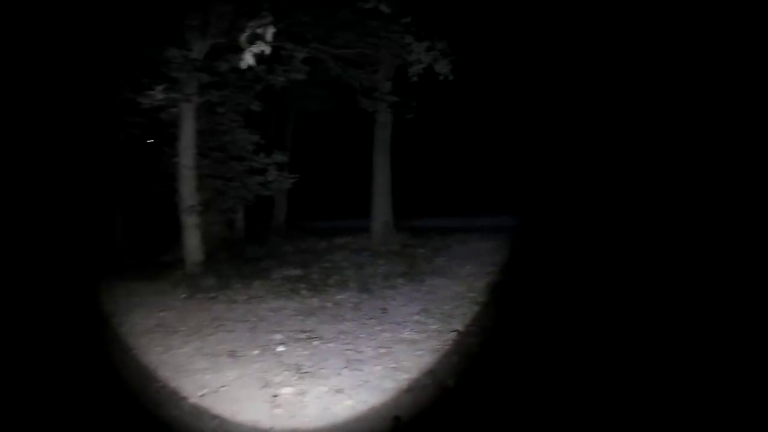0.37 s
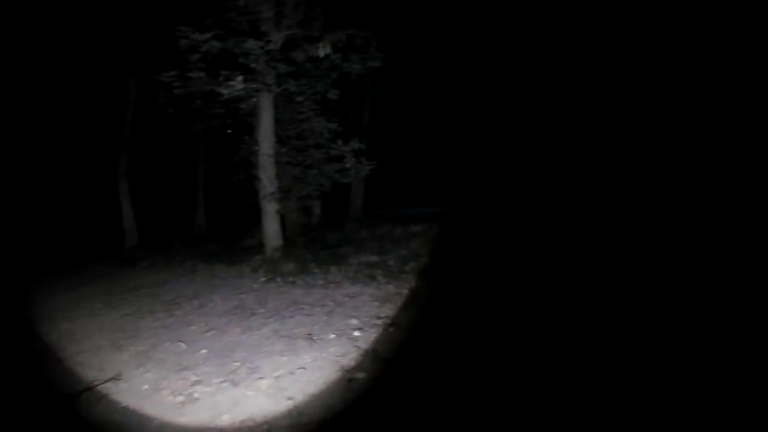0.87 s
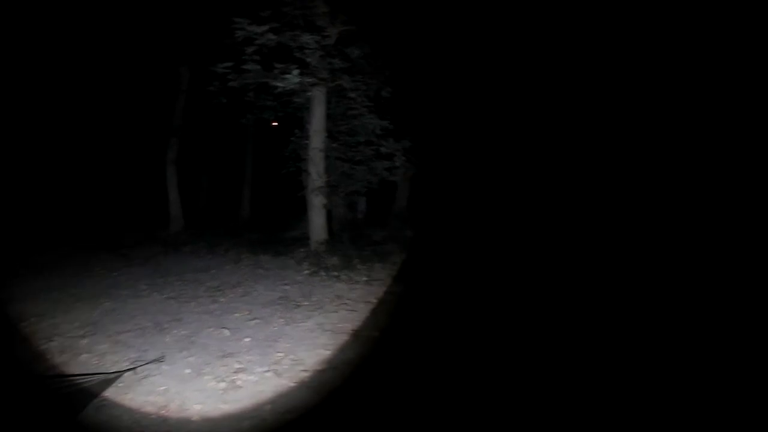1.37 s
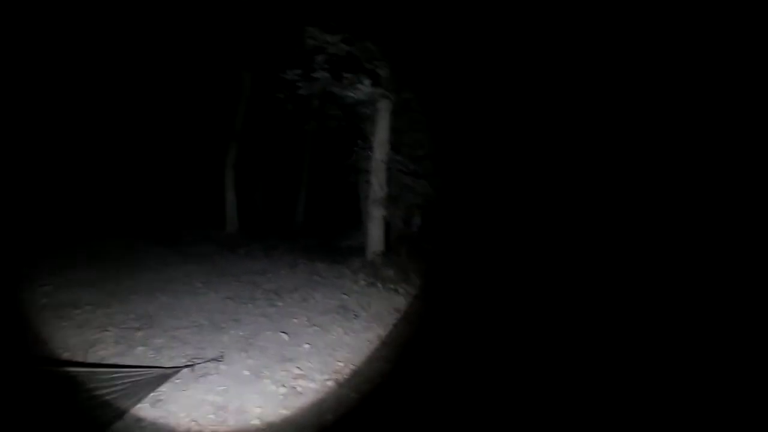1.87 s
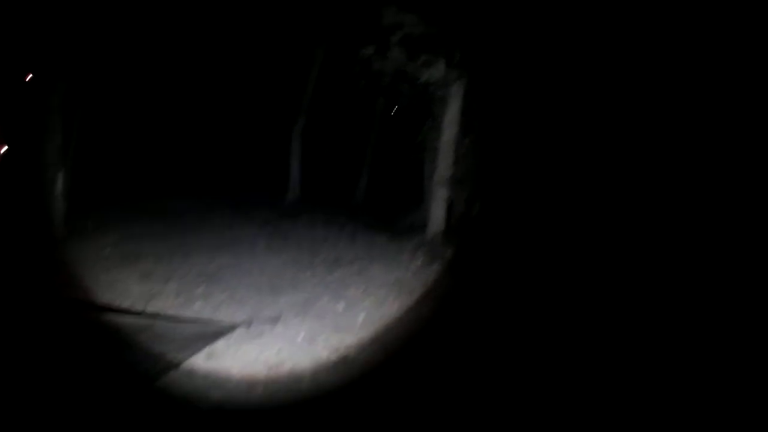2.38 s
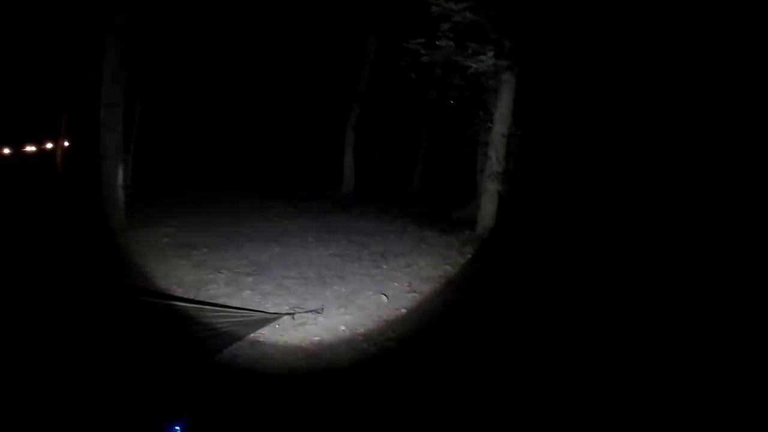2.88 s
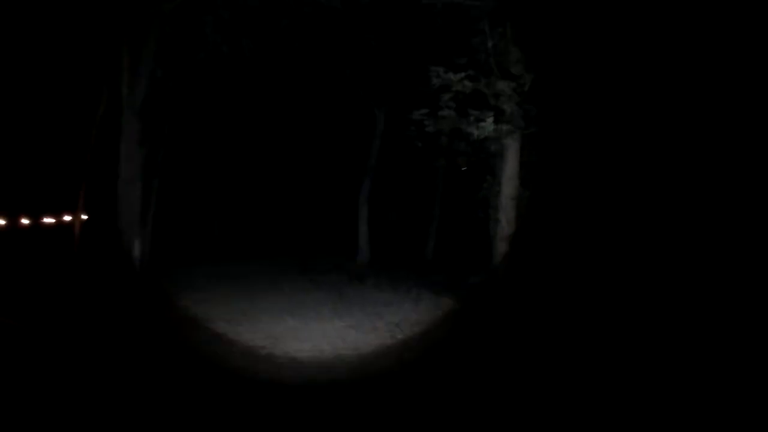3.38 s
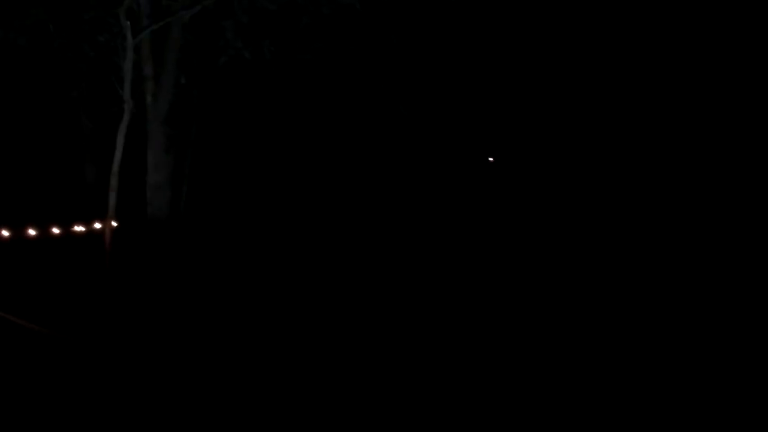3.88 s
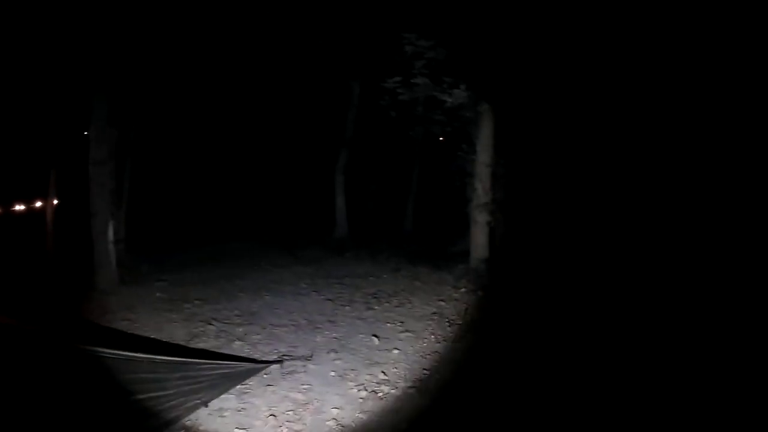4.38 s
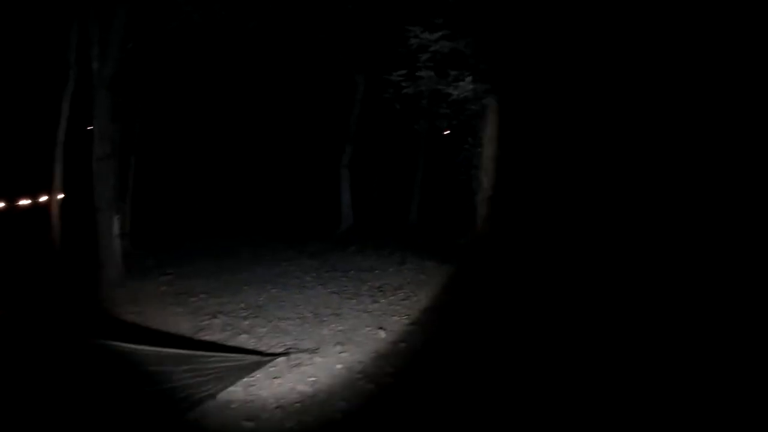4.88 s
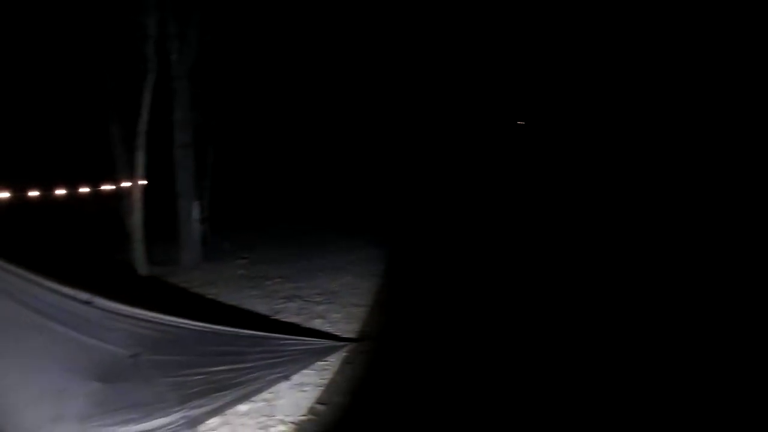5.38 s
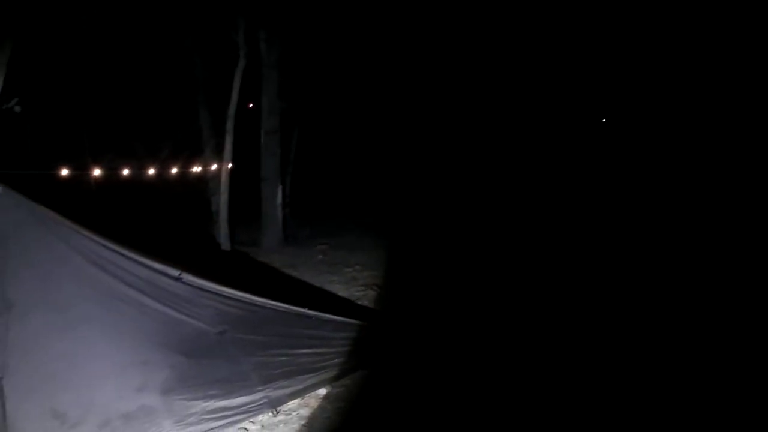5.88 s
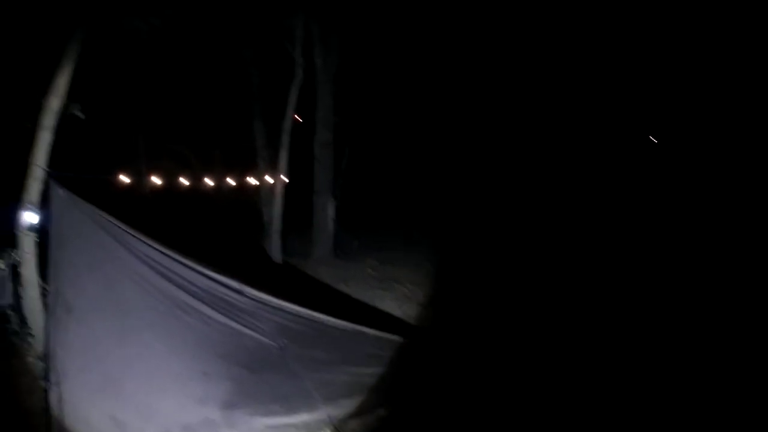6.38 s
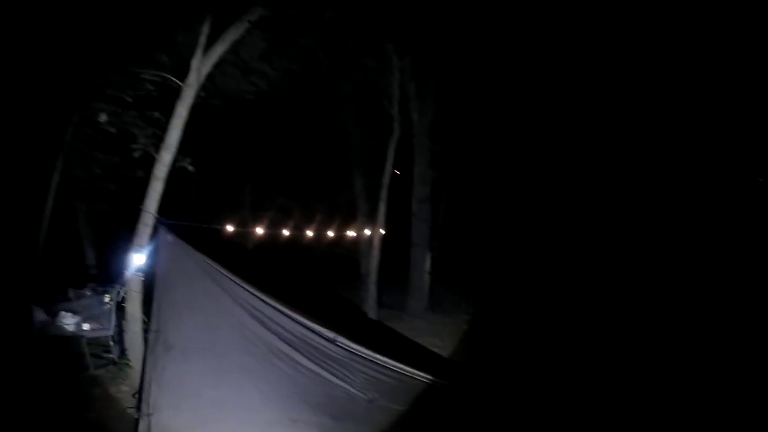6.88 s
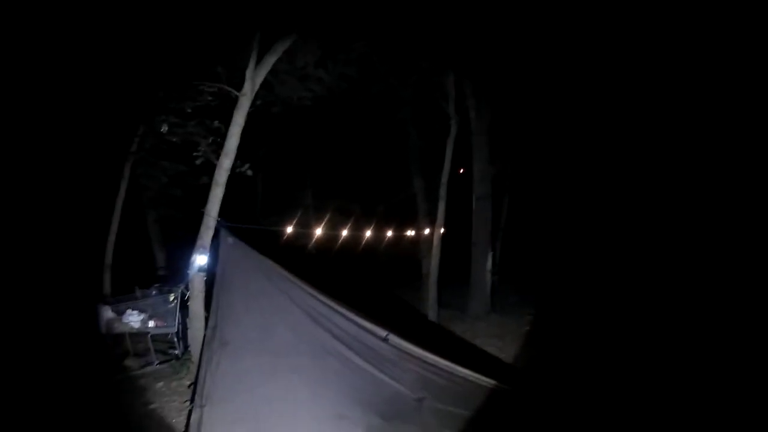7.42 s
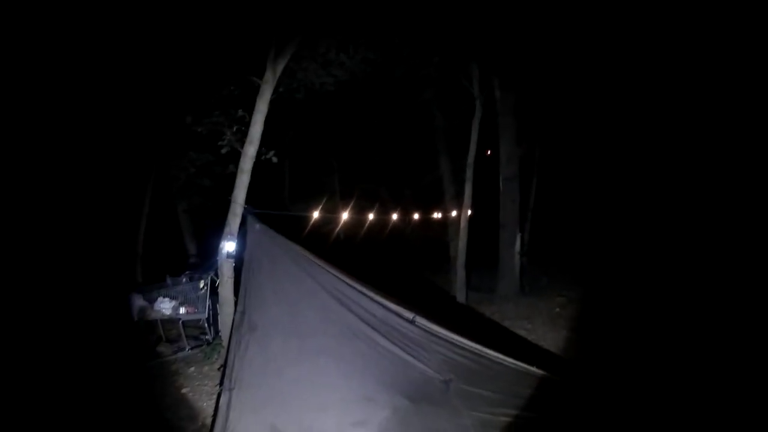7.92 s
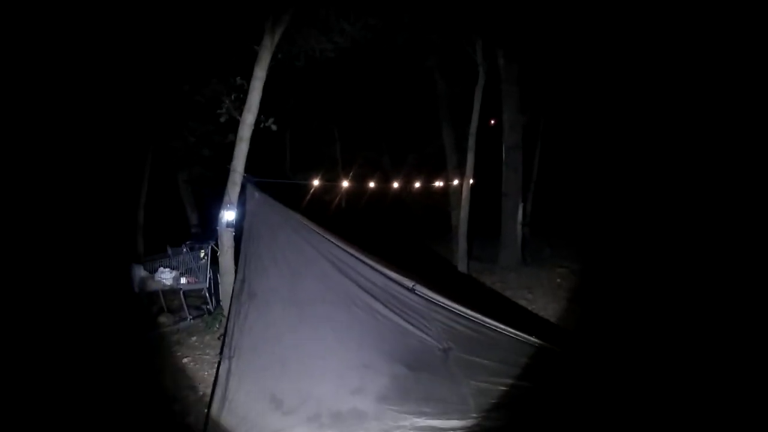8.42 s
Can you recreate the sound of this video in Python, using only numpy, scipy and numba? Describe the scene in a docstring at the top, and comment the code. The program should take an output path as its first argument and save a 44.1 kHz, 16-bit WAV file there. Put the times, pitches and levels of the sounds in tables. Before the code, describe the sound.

Night woods, heard from a handheld camera. A continuous bright bed of crickets at several pitches, faint far-insect wash and a fast, very high katydid buzz fills the air; a nearer cricket repeats short trills of roughly a third of a second or longer, with fainter chirps early and late. Light body taps fall around 0.7, 1.2, 1.5 and 1.8 s, then a heavier jolt at 2.0. The buzz fades from about 2.4 and returns near 4.6, while the chorus thins. Dull thuds land at 3.3, 3.9, 4.5 and 4.8, with a sharp snap at 3.5. Brief dry rasps come at 1.4, 5.2 and 6.8. After a quieter gap, knocks resume at 5.9 and 6.2, clustering with rustle and gritty snaps at 6.5-6.9. Insects dominate until a final rumbling bunch of thumps at 8.3-8.5.

```python
"""Footsteps and a shifting grip knock through the body of a small camera, carried slowly over dirt in a night wood:
struck modes with thuds, over band-filtered noise and grains for rumble, shuffle and scrape.
Rustles and snaps are filtered clicks and noise bursts; a wash of far insects is coloured noise.
Cricket choruses at several pitches, trills and chirps are tones gated into pulses.
One katydid buzzes high up as strokes ringing four resonances; another rasps as rippled noise."""
import sys
import numpy as np
from scipy import signal
from scipy.fft import rfft, irfft, next_fast_len
from scipy.io import wavfile
from scipy.ndimage import uniform_filter1d
from numba import njit

SR = 44100
rng = np.random.default_rng(int(sys.argv[2]) if len(sys.argv) > 2 else 0)


def makeup_ratio(level_db):
    """Linear amplitude ratio for a level in decibels (20 dB per factor of ten)."""
    decades = np.asarray(level_db, float) / 20
    return 10 ** decades


def transcribe(signal):
    """Save signal, clipped to [-1, 1], as a 16-bit WAV file at the path in sys.argv[1]."""
    frames = np.atleast_2d(signal).T
    limited = np.clip(frames, -1, 1)
    pcm = np.round(limited * 32767).astype(np.int16)
    wavfile.write(sys.argv[1], SR, pcm)


N = 376173
T = np.arange(N) / SR

# bands of the shaken casing, as rumble, low bumps, high bumps, scrape: (low edge [Hz], high edge [Hz])
SHAKE_BANDS = [(32, 91), (70, 201), (170, 299), (400, 696)]
# steady shuffle: (time [s], low bumps [dB], high bumps [dB], scrape [dB], rumble [dB])
SHUFFLE = [(0.0, -51, -62.5, -56, -49), (0.8, -53.5, -58.5, -54, -52.5), (0.94, -50, -62, -53.5, -55),
           (1.86, -53, -61.5, -50.5, -55), (2.0, -53, -57, -46.5, -44), (2.53, -47, -48.5, -47.5, -63),
           (3.08, -41, -52, -54, -50), (3.28, -41, -47.5, -52.5, -46), (3.65, -47.5, -39.5, -50, -55),
           (4.07, -43, -45.5, -53, -51), (4.37, -56.5, -43.5, -57, -47), (4.78, -41.5, -38, -63, -55),
           (5.21, -39.5, -46, -65, -54), (5.68, -43.5, -50.5, -59.5, -50), (6.85, -46, -45, -43, -57.5),
           (7.08, -49, -46.5, -49.5, -51), (7.97, -49.5, -50, -53, -55), (8.25, -51, -58, -46, -56)]
# jolts of the hand that shake the whole casing: (start [s], end [s], rumble [dB], scrape [dB])
JOLTS = [(1.983, 2.038, -28.5, -46), (6.638, 6.765, -43, -41), (7.635, 7.942, -50.5, -65),
         (8.298, 8.339, -24.5, -47), (8.363, 8.466, -25, -38)]
# bumps in a jolt, against its rumble: (low bumps [dB], high bumps [dB])
JOLT_BUMP_DB = [-7.5, -20]
# stir after a knock, against the knock: (rumble [dB], low bumps [dB], high bumps [dB], scrape [dB])
WAKE_DB = [-39, -34.5, -38, -57]
# knocks through the camera body: (time [s], swing level [dB], pitch [Hz], width at half height [ms])
KNOCKS = [(0.652, -17, 400, 0.99), (1.168, -17.5, 484, 1.16), (1.2059, -25, 386, 0.75),
          (1.4972, -17.5, 442, 0.92), (1.7971, -17.5, 463.0, 1.33), (1.8343, -28, 290, 0.54),
          (1.9923, -12, 166, 1.6), (2.0084, -11, 235, 3.9), (2.023, -17.5, 111, 11),
          (2.1124, -18.5, 493, 1.3), (2.3742, -17, 445.0, 1.36), (3.3428, -10.5, 206, 4.5),
          (3.3707, -26, 210, 7.8), (3.4359, -19, 209, 9.1), (3.5027, -24, 180, 6.3),
          (3.8894, -10.5, 249, 4.2), (3.9172, -26, 242, 14), (3.9762, -21.5, 206.0, 7.6),
          (4.0495, -18.5, 260, 3.6), (4.4996, -13, 243, 2.5), (4.6336, -25.5, 163, 2.9),
          (4.79, -11, 218, 3), (4.8226, -29.5, 228, 12), (4.927, -25.5, 174.0, 3.6),
          (4.9914, -29, 210, 6.4), (5.922, -13.5, 240, 3.3), (6.0596, -26, 217, 3.8),
          (6.1558, -14, 195, 2.2), (6.2837, -27.5, 253, 11), (6.5123, -17, 385, 1.55),
          (6.64, -14, 378, 1.4), (6.6896, -13.5, 462.0, 1.5), (6.726, -20.5, 280, 2.6),
          (6.756, -15, 233, 3.9), (6.7807, -32, 382, 1.3), (6.8932, -15.5, 386, 1.7),
          (6.9118, -40, 395.0, 2.7), (8.2858, -26, 192.4, 4.9), (8.3495, -15, 151, 8.4),
          (8.372, -12, 179, 1.8), (8.396, -13, 168.5, 13), (8.451, -17.5, 126.6, 5.3)]

# bands of the rustle: (low edge [Hz], high edge [Hz])
RUSTLE_BANDS = [(950, 1240), (1400, 3380), (2400, 3940), (6400, 8000)]
# leaves and cloth rustling: (start [s], end [s], level before band colour [dB], brightness [dB per octave])
RUSTLES = [(0, 0.16, -59, 2.5), (.62, .75, -68, -14), (1.186, 1.714, -58, -8.5), (1.93, 2.325, -60.5, 2),
           (2.413, 2.643, -61.5, -7), (3.55, 3.724, -62, -6), (3.724, 4.3, -71, -1),
           (5.923, 6.55, -57.5, -0.5), (6.6, 6.935, -52.5, -5.5), (7.45, 7.81, -66.5, -9),
           (8.065, 8.478, -58.5, -0.5)]
# colour of the spells, one value a band: (level added [dB])
RUSTLE_COLOUR_DB = [-6, -3, -1.5, -8]
# steady crackle beneath the spells, one value a band: (level [dB])
STILL_DB = [-78, -66.5, -78, -109]
# snaps of twigs, leaves and grit underfoot:
# (time [s], peak level [dB], low edge [Hz], high edge [Hz], decay constant before filtering [ms])
SNAPS = [(1.8552, -41, 1510, 1960, 2.8), (2.2613, -45, 1100, 1500, 5.), (3.484, -38, 1500, 3800, 1.),
         (3.5289, -20.5, 1110, 4440, 1.8), (3.569, -37, 2300, 4200, 4.9), (3.579, -33, 2700, 3700, 3.),
         (3.9724, -49, 10500, 12000, 2.), (6.5715, -44, 1500, 2300, 2.), (6.675, -25, 300, 1070, 2.1),
         (6.7, -36, 254, 1080, 1.8), (6.892, -33, 500, 1300, 2.3), (6.9494, -40, 1310, 2230, 2.),
         (7.234, -41, 1500, 2600, 1.8), (7.7503, -37, 1200, 3160, 1.5), (8.091, -40, 850, 1400, 2.6),
         (8.334, -37, 396, 1280, 2.6), (8.359, -29, 400, 1400, 4.9), (8.432, -37, 400, 1170, 5.6),
         (8.39, -24, 496, 1400, 7.4), (8.456, -42, 700, 2170, 2.)]
# colour of the wash of far insects: (frequency [Hz], relative density [dB])
AIR = [(530, -20), (900, -7), (1440, -31.5), (2050, -25.5), (2400, -16), (2770, 1.5), (3450, -33),
       (4500, -14), (4900, -8.5), (5950, -9), (7040, -42), (9190, -33), (11000, -30.5), (13200, -30),
       (16200, -28)]

# kinds of chorus cricket, lowest first: (pitch [Hz], spread [Hz; outermost singers lie 1.7 times this away],
# mean pulse rate [per s], sounding share of a pulse [0-1])
CHORUS = [(2226, 38, 53, .7), (2762, 80, 66, .75), (4960, 80, 41, .7), (6054, 210, 58, 0.7)]
# choruses as the walker turns: (time [s], low chorus level [dB], high chorus level [dB])
TURN = [(0.05, -49, -53), (0.16, -47, -54), (1.08, -48.5, -53.5), (1.5, -49, -52.5), (1.78, -46.5, -53),
        (2.24, -56, -56.5), (2.46, -57, -59), (2.73, -51, -55), (3.6, -54, -56), (4.11, -55.5, -59),
        (4.89, -52, -57), (5.42, -51.5, -55.5), (6.08, -51, -53), (7.06, -48.5, -53.5), (7.39, -47, -52),
        (7.88, -46, -52), (8.21, -43, -51.5), (8.44, -47.5, -52)]
# long stretches of the lowest kind: (start [s], end [s], level [dB])
DRONES = [(0, 1.22, -69.5), (1.9, 2.4, -62.5), (2.62, 4.05, -65.5), (4.65, 6.1, -71), (7.45, 7.8, -64)]
# trills of a near cricket: (start [s], end [s], level before echoes [dB], settled pitch [Hz])
TRILLS = [(.13, 0.436, -51.5, 5150), (0.682, 0.936, -49, 5110), (1.28, 1.67, -56.5, 5100),
          (1.943, 2.3, -59, 5050), (2.5, 3.217, -55.5, 5090), (3.619, 4.123, -57.5, 5070),
          (4.348, 4.64, -52.5, 5070), (4.598, 4.847, -57.5, 4910), (5.017, 5.337, -52, 5130),
          (5.624, 5.953, -49.5, 5120), (6.109, 6.452, -53.5, 5070), (7.138, 7.43, -50, 5100),
          (7.594, 7.927, -49.5, 5160), (8.153, 8.495, -56, 5085)]
# chirps of a fainter cricket: (start [s], end [s], level before echoes [dB])
CHIRPS = [(.04, 0.403, -62), (0.438, .9, -69), (0.953, 1.062, -59), (1.54, 1.66, -60), (2.564, 2.68, -62),
          (7.493, 7.8, -64), (8.053, 8.2, -65)]

# buzzing katydid: (time [s], main resonance level [dB], its centre [Hz], upper level [dB], its centre [Hz])
BUZZ = [(0.05, -54.5, 9150, -62.5, 13400), (0.42, -53.5, 9360, -62, 13400), (0.75, -54, 9400, -63.5, 13100),
        (1.43, -52, 9200, -60.5, 13000), (1.97, -50, 9400, -63, 13000), (2.44, -65, 9200, -72, 13300),
        (2.51, -66, 9360, -66, 13300), (2.74, -69, 9110, -67, 12800), (3.33, -68, 9380, -63.5, 13100),
        (3.49, -69, 9760, -68, 13400), (3.84, -73, 9460, -67.5, 13300), (4.61, -54.5, 9200, -64.5, 13100),
        (5.6, -53, 9550, -63, 13300), (5.79, -56, 9750, -62, 12700), (6.49, -56, 9320, -62, 13000),
        (6.52, -56.5, 9260, -64, 13100), (7.26, -54, 9330, -68, 13100), (7.66, -52.5, 9420, -65.5, 13100),
        (8.3, -52, 9410, -64, 12900), (8.46, -56, 9450, -72, 13400)]
# its resonances, as main, middle, upper, top: (width of each of two filters in a row [Hz])
WING_WIDTH_HZ = [2000, 1400, 1920, 2600]
# rasping katydid: (time [s; the rasp starts 3 ms before], peak level [dB])
RASPS = [(1.3786, -39), (3.246, -53), (3.9724, -54), (5.1673, -34.5), (6.818, -35)]


def curves(table):
    """Linear interpolation: the columns of a (time, value, ..) table at every sample."""
    s, *columns = np.transpose(table)
    return [np.interp(T, s, c) for c in columns]


def unit(x):
    """Power normalisation: scaled to rms 1."""
    return x / np.sqrt(np.mean(x ** 2))


def band(x, lo_hz, hi_hz, order=2):
    """Band-pass filtering with a maximally flat response."""
    return signal.sosfilt(signal.butter(order, [lo_hz, hi_hz], "bandpass", fs=SR, output="sos"), x)


def walk(rate):
    """Slow random modulation: levels held 1 / rate s, smoothed by two moving means; spread near 1."""
    k = int(SR / rate)
    held = np.repeat(rng.standard_normal(N // k + 1), k)
    return 1.3 * uniform_filter1d(uniform_filter1d(held, k), k)[:N]


def grains(per_s, spread_db):
    """Random impulse train: clicks of either sign, a few much larger than the rest."""
    chance = rng.random((3, N))
    struck = chance[0] < per_s / SR
    return struck * np.sign(chance[1] - .5) * makeup_ratio(-spread_db * np.log(1 - chance[2]))


def add(out, s, x):
    """Superposition: mixes a short sound in at a time."""
    i = int(s * SR)
    out[i:i + len(x)] += x[:N - i]


def spells(rows, edge_s):
    """Gating: each (start, end, level) row fades in, holds and fades out."""
    gain = 0
    for start, end, db in rows:
        gain = gain + makeup_ratio(db) * np.clip(np.minimum(T - start, end - T) / edge_s + .5, 0, 1)
    return gain


@njit
def singer(hz, per_s, share, start, sag):
    """Stridulation as a wing tone gated into pulses; the pitch sags through each pulse."""
    out, pulse, phase = np.zeros(len(hz)), start, 0.
    for i in range(len(hz)):
        pulse += per_s / SR
        if pulse >= 1:
            pulse -= 1
        if pulse < share:
            u = pulse / share
            phase += 2 * np.pi * hz[i] * (1 - sag * (u - .5)) / SR
            out[i] = 4 * u * (1 - u) * np.sin(phase)
    return out


@njit
def resonance(x, hz, width):
    """State-variable resonance whose centre may move, gain 1 at the centre."""
    y, b, l = np.empty(len(x)), 0., 0.
    for i in range(len(x)):
        g, k = np.tan(np.pi * hz[i] / SR), width / hz[i]
        v = (b + g * (x[i] - l)) / (1 + g * (g + k))
        b, l, y[i] = 2 * v - b, l + 2 * g * v, k * v
    return y


def movement():
    """Random excitation: noise rumble, and shuffle and scrape grains from feet and grip, stirred by blows."""
    bumps = grains(500, 0.73) + 0.049 * rng.standard_normal(N)
    drives = [rng.standard_normal(N), bumps, bumps, bumps + grains(1500, 1.64)]
    low_db, high_db, scrape_db, rumble_db = curves(SHUFFLE)
    jolt_rumble = spells([(start, end, db) for start, end, db, _ in JOLTS], .015)
    jolt_scrape = spells([(start, end, db) for start, end, _, db in JOLTS], .015)
    low_jolt, high_jolt = makeup_ratio(JOLT_BUMP_DB)
    gains = [makeup_ratio(rumble_db) + jolt_rumble,
             makeup_ratio(low_db) + low_jolt * jolt_rumble,
             makeup_ratio(high_db) + high_jolt * jolt_rumble,
             makeup_ratio(scrape_db) + jolt_scrape]
    # every knock leaves a decaying stir behind it
    wake_s = 0.083
    struck = np.zeros(N)
    struck[[int(row[0] * SR) for row in KNOCKS]] = makeup_ratio(np.array(KNOCKS)[:, 1])
    wake = signal.lfilter([1], [1, -np.exp(-1 / (wake_s * SR))], struck)
    out = 0
    for gain, wake_db, drive, edges in zip(gains, WAKE_DB, drives, SHAKE_BANDS):
        flutter = makeup_ratio(1.3 * walk(25) + 3.03 * walk(8))
        out = out + (gain + makeup_ratio(wake_db) * wake) * flutter * unit(band(drive, *edges))
    return out


def rustle():
    """Filtered impulse noise: dense leaf crackle whose colour shifts from spell to spell."""
    crackle = grains(5000, 1.5)
    gains = []
    for still_db, colour_db, (lo, hi) in zip(STILL_DB, RUSTLE_COLOUR_DB, RUSTLE_BANDS):
        octaves = np.log2(np.sqrt(lo * hi) / 2000)
        rows = [(start, end, db + colour_db + tilt * octaves) for start, end, db, tilt in RUSTLES]
        gains.append(makeup_ratio(still_db) + spells(rows, 0.065))
    # the katydid's buzz carries a soft hiss just below it, 13 dB under its main resonance
    gains[-1] = gains[-1] + makeup_ratio(curves(BUZZ)[0] - 13)
    out = 0
    for gain, edges in zip(gains, RUSTLE_BANDS):
        out = out + gain * makeup_ratio(1.5 * walk(8)) * unit(band(crackle, *edges, order=3))
    return out


def far_insects():
    """Spectral shaping: the wash of far insects is white noise weighted by frequency."""
    (hz, db), size = np.transpose(AIR), next_fast_len(N)
    log_hz = np.log(np.fft.rfftfreq(size, 1 / SR) + 1)
    colour = makeup_ratio(np.interp(log_hz, np.log(hz), db, left=-60, right=-80))
    wash = irfft(rfft(rng.standard_normal(size)) * colour, size)[:N]
    return makeup_ratio(-49.5) * unit(wash)


def chorus(count=7):
    """Incoherent superposition: singers of each kind differ in pitch and pace; the middle ones are loudest."""
    low_db, high_db = curves(TURN)
    # the middle chorus follows the high one, with swells of its own
    middle_db = high_db - 3.5 + 2.5 * walk(2.94)
    gains = [spells(DRONES, 0.074), makeup_ratio(low_db), makeup_ratio(middle_db), makeup_ratio(high_db)]
    places, out = np.linspace(-1, 1, num=count), 0
    for (hz, spread_hz, per_s, share), gain in zip(CHORUS, gains):
        sway, crowd = walk(14), 0
        swell = makeup_ratio(2.04 * sway)
        # shifts in time let each singer swell and waver alone
        for place, (a, b) in zip(places, rng.random((count, 2))):
            pitch = hz + spread_hz * (1.7 * place + .25 * np.roll(sway, int(b * N)))
            song = singer(pitch, per_s * (.8 + .4 * b), share, a, 0.023)
            crowd = crowd + makeup_ratio(-7 * place ** 2) * np.roll(swell, int(a * N)) * song
        out = out + gain * unit(crowd)
    return out


def buzzing_katydid():
    """Forced resonance: wing strokes, strong and weak in turn, ring four resonances."""
    strokes_per_s, jitter_s = 150.5, 1.5e-5
    stroke = np.cumsum(strokes_per_s * (1 + .0015 * walk(2.4) + .0012 * walk(40))) / SR
    turn = np.floor(stroke).astype(int)
    weak = turn % 2
    chance = rng.standard_normal((turn[-1] + 1, 2))[turn].T
    size = makeup_ratio(0.34 * chance[0] - 1.1 * weak)
    offset_s = (stroke % 1 - .5 + 0.0309 * weak) / strokes_per_s - jitter_s * chance[1]
    click = np.exp(-(offset_s / 4e-5) ** 2) * np.cos(2 * np.pi * 11500 * offset_s)
    scrape = np.exp(-(offset_s / 0.00023) ** 2) * rng.standard_normal(N)
    stroked = size * (click + .2 * scrape)
    # echoes from the trees and a little noise fill in between the strokes
    echoes = 0.073 * np.roll(stroked, 140) + 0.14 * np.roll(stroked, 225)
    drive = stroked + echoes + 0.081 * rng.standard_normal(N)
    main_db, main_hz, upper_db, upper_hz = curves(BUZZ)
    levels = [main_db, (main_db + upper_db) / 2 - 13.5, upper_db, upper_db - 6.5]
    centres = [main_hz, 11420 + 200 * walk(0.58), upper_hz, np.full(N, 14400.)]
    out = 0
    for db, hz, width_hz in zip(levels, centres, WING_WIDTH_HZ):
        ring = unit(resonance(resonance(drive, hz, 1. * width_hz), hz, 1. * width_hz))
        # neighbouring resonances swing in opposite sense
        out = -out + makeup_ratio(db + 1.1 * walk(2.89)) * ring
    return out


def near_crickets():
    """Pulse modulation: each phrase of a tone on an even pulse fades in and out, then echoes."""
    # each trill starts 91.1 Hz flat and settles
    phrases = [(*row, 91.1, 47, .65, .025) for row in TRILLS]
    # the chirper's pulses are slower, fill less of each cycle and fall further
    phrases += [(*row, 4176, 0, 26, .45, .05) for row in CHIRPS]
    waver, out = .005 * walk(250), np.zeros(N)
    for start, end, db, hz, flat_hz, per_s, share, sag in phrases:
        along = np.linspace(0, 1, num=int((end - start) * SR))
        wavering = 1 + waver[int(start * SR):][:len(along)]
        pitch = hz * wavering - flat_hz * np.exp(-along / .2)
        song = unit(singer(pitch, 1. * per_s, share, 0., sag))
        fade = np.minimum(np.minimum(along, 1 - along) * (end - start) / 0.023, 1)
        add(out, start, makeup_ratio(db) * song * fade)
    out = out * makeup_ratio(1.5 * walk(30))
    # leaves send the songs back a moment later and fill their gaps
    return 1.07 * out + 0.44 * np.roll(out, 470) + 0.24 * np.roll(out, 1130)


def knocks():
    """Impact of damped modes: a swing or two of the casing, a tick or first contact, a thud and a shudder."""
    out = np.zeros(N)
    t = np.arange(-600, 5000) / SR
    after = np.maximum(t, 0)
    for (s, db, hz, ms), noise in zip(KNOCKS, rng.standard_normal((len(KNOCKS), len(t)))):
        shape = np.exp(-np.log(2) * (2 * t / (ms / 1000)) ** 2)
        swing = shape * np.cos(2 * np.pi * hz * t)
        light = hz > 350
        # heavy blows push the diaphragm in, light taps pull it out
        if light:
            swing = swing + 0.072 * shape ** 2 * np.sin(2 * np.pi * 1.46 * hz * t)
        else:
            # a contact at 330 Hz leads the heavy blow by 5 ms
            first = np.exp(-((t + 0.005) / 0.0019) ** 2) * np.cos(2 * np.pi * 330 * (t + 0.00485))
            swing = 0.37 * first - swing
        thud = np.sin(2 * np.pi * 85 * after) * np.exp(-after / 0.011) * np.minimum(after / 0.00246, 1)
        thud = thud * (.2 if light else 1)
        fade = np.exp(-after / 0.054) * np.minimum(after / 0.0034, 1) ** 2
        shudder = unit(band(noise, 0.33 * hz, 1.44 * hz, order=3)) * fade
        add(out, s + t[0], makeup_ratio(db) * (swing + makeup_ratio(-6.0) * thud + makeup_ratio(-18) * shudder))
    return out


def rasping_katydid():
    """Amplitude-modulated noise: two strokes, each rippled 250 times a second."""
    out, t = np.zeros(N), np.arange(1500) / SR
    strokes = np.sin(np.pi * t / .017) ** 2 * (t < .031)
    ripple = 2.5 + np.cos(np.pi * 250 * t) ** 2
    for (s, db), noise in zip(RASPS, rng.standard_normal((len(RASPS), len(t)))):
        rasp = band(noise * strokes * ripple, 7100, 8700, order=3)
        add(out, s - .003, makeup_ratio(db) * rasp / np.abs(rasp).max())
    return out


def snaps():
    """Transient fracture: bursts of noise with a sharp onset and exponential decay, band-passed."""
    out, t = np.zeros(N), np.arange(900) / SR
    for (s, db, lo_hz, hi_hz, ms), noise in zip(SNAPS, rng.standard_normal((len(SNAPS), len(t)))):
        burst = noise * np.exp(-1000 * t / ms) * np.minimum(t / 0.00015, 1)
        snap = band(burst, lo_hz, hi_hz, order=5)
        add(out, s, makeup_ratio(db) * snap / np.abs(snap).max())
    return out


def scene():
    """Linear superposition: all sources arrive at one spot."""
    ground = movement() + rustle() + knocks() + snaps()
    insects = far_insects() + chorus() + buzzing_katydid() + near_crickets() + rasping_katydid()
    mono = ground + insects
    return np.array([mono, mono])


def band_limit(x):
    """A steep low-pass at the top of the band."""
    return signal.sosfilt(signal.butter(12, 16390, fs=SR, output="sos"), x)


def record(dry):
    """Sum and difference stereo: nearly the same left and right below 12 kHz, with a faint fluttering side;
    above, the side flutters more strongly and the left is louder."""
    dry = signal.sosfilt(signal.butter(2, 25, "high", fs=SR, output="sos"), dry)
    top = signal.sosfiltfilt(signal.butter(8, 12000, "high", fs=SR, output="sos"), dry[0])
    flutter = walk(300)
    faint = makeup_ratio(-40.5) * flutter * band(dry[0], 450, 19845, order=1)
    side = .5 * flutter * top + 0.27 * top + faint
    return band_limit(dry + np.array([side, -side]))


dry = scene()
out = record(dry)
transcribe(out)
```